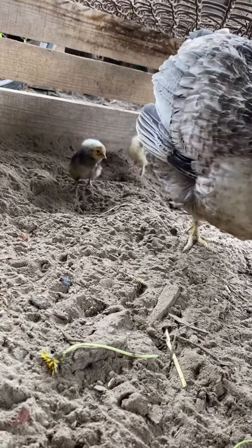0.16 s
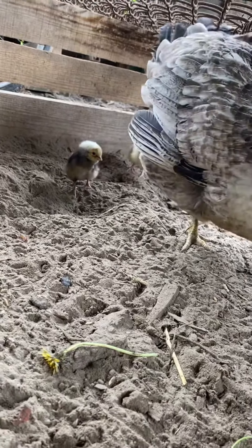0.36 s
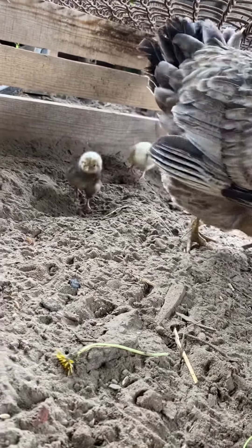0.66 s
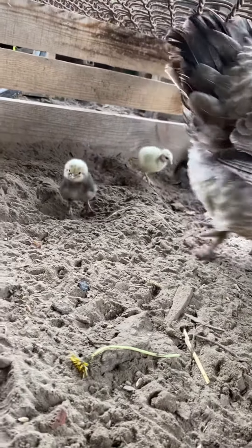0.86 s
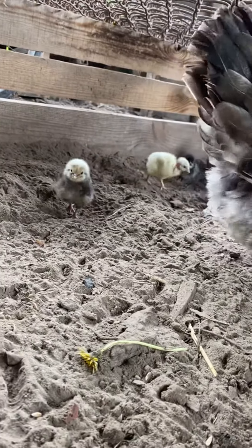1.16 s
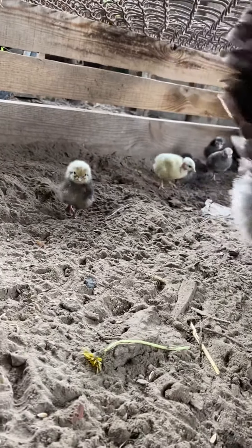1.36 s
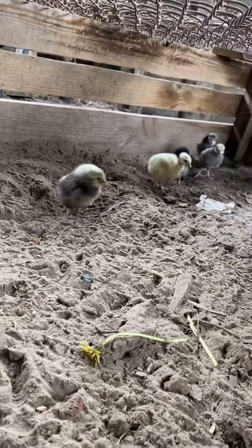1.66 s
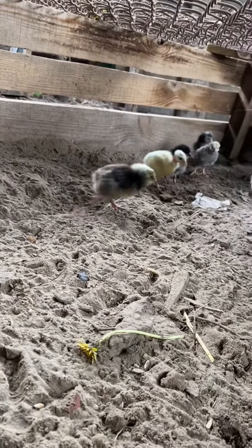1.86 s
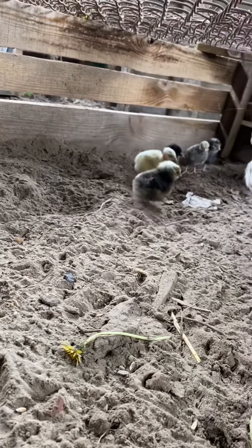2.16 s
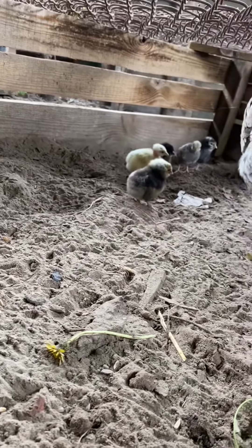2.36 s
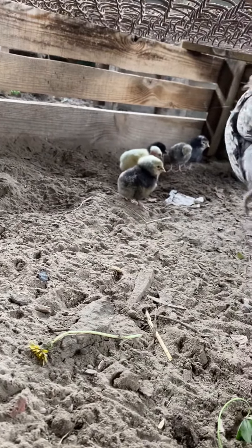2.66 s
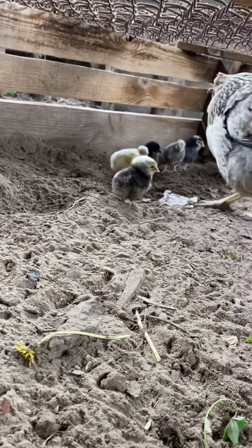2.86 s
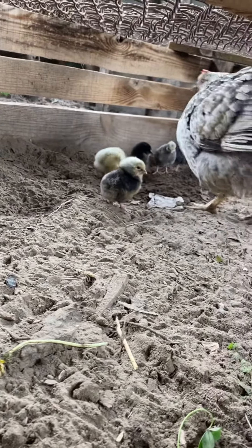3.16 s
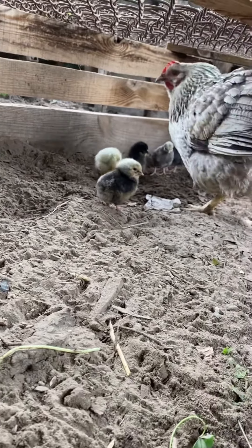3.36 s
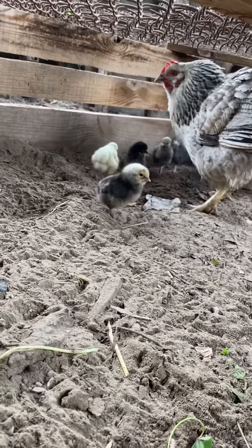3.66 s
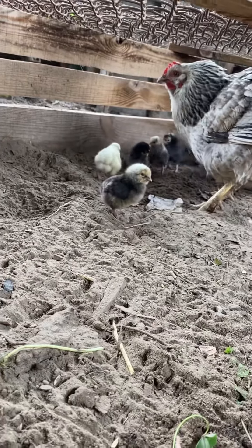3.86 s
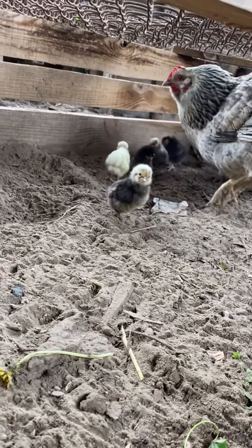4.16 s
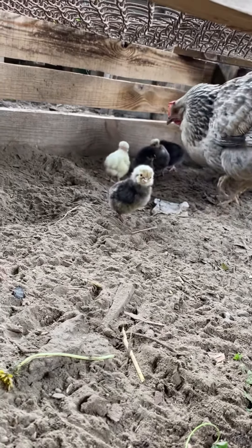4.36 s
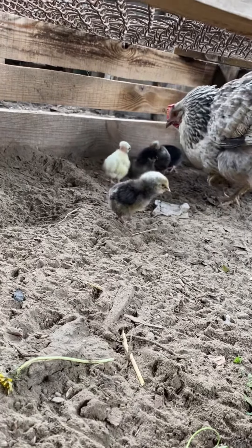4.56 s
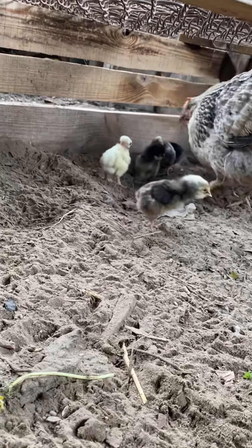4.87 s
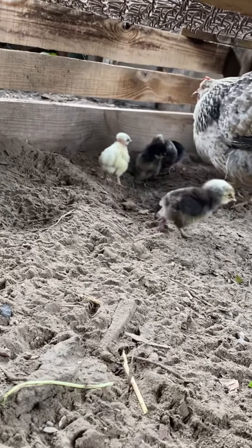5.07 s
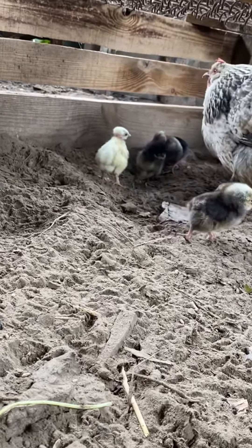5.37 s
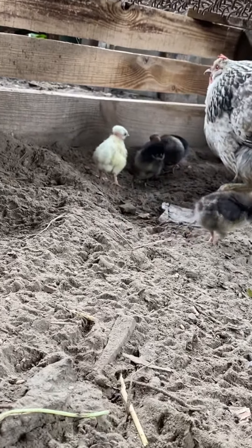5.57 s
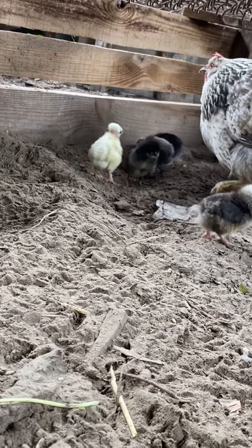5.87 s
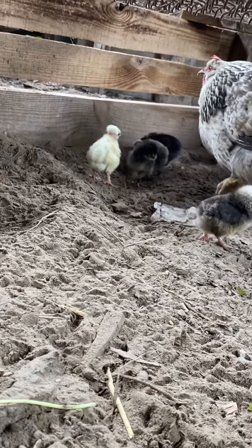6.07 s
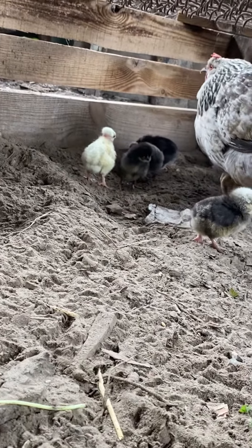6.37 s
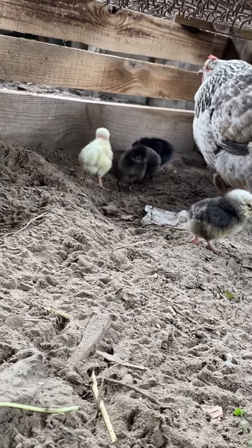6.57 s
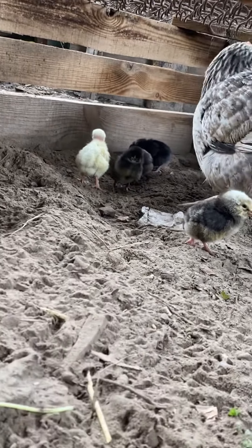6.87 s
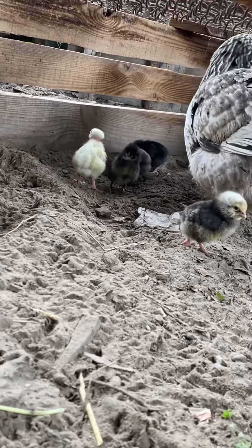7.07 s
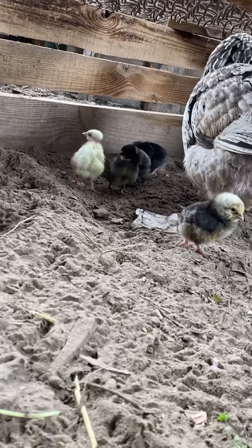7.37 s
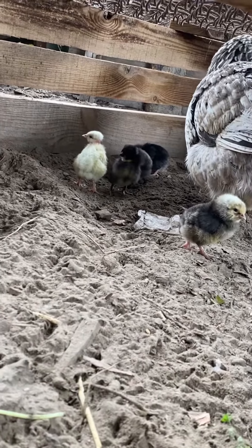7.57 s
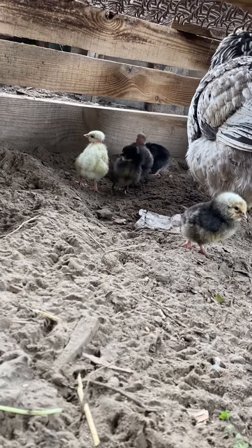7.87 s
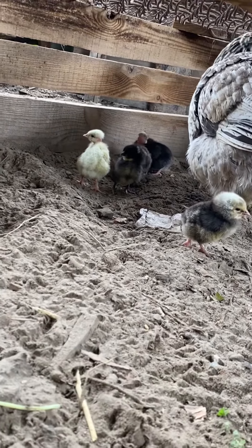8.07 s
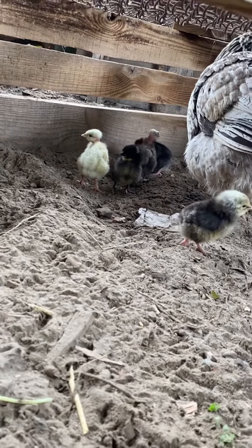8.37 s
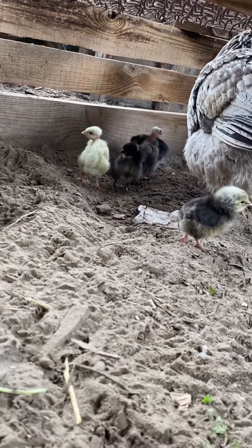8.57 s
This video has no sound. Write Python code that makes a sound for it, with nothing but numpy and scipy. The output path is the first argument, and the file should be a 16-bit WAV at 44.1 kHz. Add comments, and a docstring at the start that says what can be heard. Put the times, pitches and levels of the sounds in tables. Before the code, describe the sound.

Soft chick twitters and light taps lead to five sharp cries, a brief silent gap, then denser peeps, shuffling feet and distant clucks.

```python
"""A brood of chicks on the sandy floor of a plank-walled pen in a farmyard.
First come soft twitters and pips over taps and scratches in the sand, then one chick on the left cries loudly.
The sound fades to silence and returns with arched peeps and pips off to the right, as feet shuffle.
Further off a rooster crows and a hen clucks her way up to a squawk.
The chicks are whistles with a second voice, the fowl harmonics through a throat, feet and air shaped noise."""
import sys
import numpy as np
from scipy import signal
from scipy.fft import rfft, irfft, next_fast_len
from scipy.io import wavfile
from scipy.ndimage import map_coordinates

SR = 44100
rng = np.random.default_rng(int(sys.argv[2]) if len(sys.argv) > 2 else 0)


def put_to_file(sound):
    """Save the sound as 16-bit audio at rate SR, in the file named by the first command-line argument."""
    columns = np.atleast_2d(sound).T  # one column per channel
    safe = np.clip(columns, -1, 1)
    whole_steps = np.round(safe * 32767)
    wavfile.write(sys.argv[1], SR, whole_steps.astype(np.int16))


N = 384993
TIME = np.arange(N) / SR
PAUSE_START_S, PAUSE_END_S = 3.72, 4.335
CUTOFF_HZ = 15850

# In the call tables level_db is the base to which the effort over the call is added;
# second_db sets the second voice, overtone_db the overtones before the beak shapes them.

# Twitters, a held note that flicks up and drops: start_s, top_s (after the start), drop_s, held_hz,
# start_offset_hz (from the held note), top_hz, level_db, second_db, overtone_db
TWITTERS = [(0.026, .046, 0.019, 3650, -13, 4230, -25, -7, -22.5),
            (0.104, .019, 0.0077, 2540, 0, 3100, -31, -30, -15.5),
            (0.167, .032, 0.0097, 2760, 2, 3560, -37, -12, -21),
            (0.375, 0.045, 0.0049, 2630, 295, 3360, -17.5, -24, -30),
            (0.495, .042, .005, 3020, 183, 3750, -33.5, -30, -42),
            (0.525, .056, 0.0078, 3250, 52, 3960, -28, -33, -44),
            (0.663, 0.04, 0.004, 3610, 0, 4370, -34.5, -13, -30),
            (0.74, 0.05, 0.016, 3690, -130, 4200, -24, -13, -31),
            (0.943, 0.048, 0.02, 3640, 0, 4190, -20, -9.5, -23.5),
            (1.040, 0.011, .007, 2940, 0, 3500, -38, -25, -27),
            (1.054, 0.02, 0.0075, 2310, 150, 3400, -29.5, -25, -15),
            (1.212, 0.04, 0.0013, 3186, -6, 4470, -32.5, -21, -33),
            (1.277, 0.013, .003, 3060, 0, 3740, -44, -25, -25),
            (1.716, 0.031, .003, 2930, -2, 3100, -41.5, -10, -25),
            (1.755, 0.046, 0.0087, 2816, 141, 3390, -28, -28, -24),
            (2.435, .03, .006, 2880, 1, 3260, -40.5, -24.5, -23)]
FLICK_S, DROP_HZ_PER_S = 0.018, 79000
# below the held note: at the start, the top and the end
TWITTER_SWELL_DB, FLICK_LOSS_DB, DROP_LOSS_DB = 6, 5.5, 8.5

# Cries, loud calls that swell as they sag and then plunge: start_s, length_s, level_db
CRIES = [(2.174, 0.11, -17), (2.456, 0.13, -15.5), (2.75, 0.14, -19), (3.064, 0.14, -21),
         (3.37, .14, -27.5)]
# Sag, shoulder, plunge and a short foot of a cry: share_of_call, pitch_hz
CRY_PITCH = [(0, 4720), (.28, 4266), (.72, 3760), (.91, 2530), (1, 2289)]
# Effort through a cry: share_of_call, effort_db
CRY_EFFORT = [(0, -23.5), (.28, -12.5), (.62, -5), (.74, 1.5), (.9, -10), (1, -18)]

# Peeps, long arches: start_s, length_s, crest_hz, bow (of the fall: 1 = straight, more = held longer),
# level_db, second_db, overtone_db
PEEPS = [(4.385, .14, 4400, 2, -52, -15, -17), (4.639, 0.12, 3830, 1.67, -31, -4, -20.5),
         (4.874, 0.13, 4170, 1.43, -29.5, -4.5, -17.5), (5.431, 0.15, 3460, 1.73, -42, -12, -34),
         (5.467, 0.13, 4240, 1.5, -31, -11.5, -17), (5.673, 0.14, 3670, 1.7, -40, -26, -21),
         (5.750, 0.12, 4180, 1.92, -28.5, -6, -15.5), (6.525, 0.12, 3970, 1.45, -29.5, -10, -16),
         (6.744, 0.11, 3940, 1.8, -25, -20, -17.5), (7.152, 0.16, 4070, 1.97, -23.5, -10, -22.5),
         (7.385, .2, 3300, 1.9, -39, -25, -21), (7.422, 0.11, 3913, 1.95, -25, -8, -19.5),
         (7.731, 0.11, 4054, 2.2, -28, -6.5, -17.5), (7.833, 0.11, 3980, 1.24, -31.5, -15, -15),
         (7.895, 0.094, 3375, 2.1, -32.5, -11, -33), (8.094, .116, 4120, 1.65, -29, -27, -17),
         (8.177, 0.087, 3690, 1.8, -32.5, -7, -19.5), (8.275, 0.11, 4034, 1.7, -39.5, -6, -19),
         (8.351, 0.085, 3546, 1.8, -34.5, -22, -32), (8.416, .125, 4330, 1.2, -37, -24, -23),
         (8.497, 0.086, 3880, 1.8, -40, -11, -11), (8.585, 0.14, 4320, 1.75, -35, -11, -11.5)]
# Effort through a peep: share_of_call, effort_db
PEEP_EFFORT = [(0, -10), (.17, -7), (.62, -1.5), (1, -3)]
PEEP_RISE_S, PEEP_MEAN_RISE_HZ_PER_S, PEEP_END_HZ, PEEP_PAN_DB = 0.02, 37000, 2310, -9

# Pips, short slurs, soft to loud: start_s, length_s, rise_s, top_hz, end_hz, bow (of the fall), level_db,
# overtone_db, pan_db (left over right)
PIPS = [(0.684, 0.039, 0.0086, 3350, 2620, 0.48, -32, -14, -1),
        (0.917, 0.036, 0.0091, 3480, 2680, 0.85, -31, -10.5, -1),
        (1.846, 0.031, 0.00053, 3900, 2656, 0.56, -20, -19, -2.5),
        (1.962, 0.081, 0, 3647, 3270, 1.14, -16.5, -14.5, 4),
        (2.004, 0.025, 0.00066, 3475, 2740, 1.46, -16.5, -21, -3),
        (2.039, .018, 0.0013, 2800, 2740, 0.83, -30.5, -20.5, 2.5),
        (2.104, 0.067, 0.0025, 4360, 2980, 0.95, -28, -13, 11.5),
        (2.179, 0.054, 0.007, 3420, 2910, 1.7, -26.5, -29, -4),
        (2.364, 0.058, 0.002, 3650, 2920, 1.8, -28.5, -36, -3.5),
        (2.868, 0.044, 0.0023, 3840, 2950, 1.5, -30, -22, 5),
        (3.008, 0.042, 0.0026, 5370, 4480, 0.89, -47, -16, 9),
        (3.038, 0.047, 0, 3910, 2690, 1.4, -26, -15.5, 11.5),
        (4.346, 0.053, 0.0045, 2624, 2440, 3.5, -31.5, -26.5, -8),
        (4.475, 0.068, .024, 2800, 2480, 1.9, -38.5, -18, -8.5),
        (4.739, 0.044, 0, 2750, 2450, 1.07, -38.5, -12, -8),
        (5.596, 0.04, .01, 2660, 2430, 1.5, -29.5, -34, -7),
        (5.755, 0.068, .025, 2810, 2520, 1.73, -34.5, -17, -7.5),
        (6.065, 0.073, 0.028, 3630, 2940, 0.63, -34.5, -17, -12),
        (6.21, 0.085, 0.029, 3780, 2900, 0.64, -34.5, -14, -11.5),
        (6.411, 0.036, 0.0094, 3300, 2550, 1.3, -29, -20, -12.5),
        (6.506, 0.039, 0, 3040, 2430, 0.84, -31.5, -30, -16),
        (6.532, 0.04, 0.02, 3420, 2670, 0.63, -26.5, -36, -12),
        (6.677, 0.053, 0.012, 3470, 2400, 1.08, -28.5, -26, -12),
        (6.763, 0.057, .022, 2627, 2390, 2, -29, -22, -11),
        (6.909, 0.053, .018, 2775, 2500, 2, -32.5, -19.5, -8.5),
        (7.035, 0.064, 0.011, 3515, 2950, 1.5, -36.5, -22, -13),
        (7.165, .049, 0.0071, 2920, 2590, 1.3, -30.5, -21, -17),
        (7.332, 0.043, 0.0034, 3020, 2660, 1.25, -32.5, -29, -9),
        (7.645, 0.096, 0.025, 3440, 2580, 0.72, -33, -20, -11),
        (7.661, 0.1, 0.019, 3860, 3090, 0.74, -34.5, -14, -8),
        (7.753, 0.052, 0.017, 3160, 2340, 0.46, -26.5, -40, -13),
        (8.101, 0.057, 0.0035, 3480, 2080, 1.1, -33, -38, -14),
        (8.271, 0.032, 0.01, 3630, 2190, 0.87, -34.5, -10, -11),
        (8.300, 0.054, 0, 3020, 2425, 1.03, -28, -27, -12.5),
        (8.581, 0.05, 0.0081, 3210, 2520, 0.66, -34.5, -20, -13)]
# Effort through a pip: share_of_call, effort_db
PIP_EFFORT = [(0, -9), (.28, -4.5), (.6, -1), (1, -7.5)]
PIP_MEAN_RISE_HZ_PER_S = 16200

# How a chick's throat and beak pass the overtones: frequency_hz, gain_db
BEAK = [(4500, 0), (5400, 3), (6500, -3), (7800, -1.5), (8700, -6), (10000, -33.5), (12000, -22.5),
        (15000, -39.5)]

# The hen's clucks, about four a second: start_s, level_db
CLUCKS = [(4.81, -50), (5.031, -48.5), (5.271, -50.5), (5.498, -50), (5.731, -49), (5.959, -47.5),
          (6.217, -50.5), (6.468, -42.5), (6.736, -49.5), (7.022, -45.5), (7.289, -59), (7.529, -46),
          (7.802, -48.5)]
CLUCK_S, CLUCK_TOP_HZ = 0.0796, 368.8
# The hen's squawk: time_s, pitch_hz, level_db
SQUAWK = [(7.89, 511, -39), (7.92, 511.7, -44), (7.97, 526, -45.5), (8.0, 605, -39.5), (8.11, 608, -45),
          (8.19, 639, -44.5), (8.26, 595, -51.5)]
# The rooster's crow: time_s, pitch_hz, level_db
CROW = [(4.56, 577, -66.5), (4.82, 596, -55.5), (5.0, 594.5, -52.5), (5.12, 592.6, -53), (5.2, 578, -62)]
# Throat of a grown fowl: frequency_hz, gain_db
THROAT = [(250, -20), (600, -7.5), (830, 0), (1120, 2.5), (1480, -4), (1850, -7.5), (2400, -16),
          (4000, -31)]

# Pecks and footfalls: start_s, peak_db, centre_hz
TAPS = [(0.403, -39, 1530), (.557, -42, 1700), (0.631, -42, 4930), (0.792, -27, 1710), (1.096, -34, 2200),
        (1.335, -47, 3200), (1.427, -43, 4100), (1.601, -31, 3760), (2.041, -41.5, 870), (3.319, -44, 2230),
        (3.347, -46.5, 1800), (3.561, -45, 1533), (6.607, -37, 8200), (7.428, -37, 7320),
        (8.344, -35.5, 487.5), (8.686, -30, 7040)]
# Feet sweeping the sand: start_s, length_s, level_db
SCRATCHES = [(0.615, 0.05, -49.5), (0.748, 0.094, -46), (1.061, 0.037, -49), (4.36, 0.039, -64),
             (5.103, 0.099, -48), (6.369, 0.041, -43), (6.91, .06, -51), (8.275, 0.12, -58)]
# Shuffling in the sand: time_s, level_db (midway between the ears)
SHUFFLE = [(4.35, -64.5), (5.35, -72.5), (5.6, -52), (6.0, -61.5), (6.55, -45), (6.98, -58.5), (7.2, -49.5),
           (7.58, -52), (7.8, -49), (8.73, -46.5)]
# Colour of moving sand: frequency_hz, density_db (per Hz)
SAND = [(800, -9.5), (2500, 3.5), (5000, -2), (9000, -2.5), (12000, -4.5), (16000, -20)]

# Murmur of the yard's air before the pause: time_s, level_db
EARLY_AIR = [(0, -51.5), (2.4, -52), (3.1, -57.5), (3.48, -65.5), (3.7, -68.5)]
# Murmur after the pause: time_s, level_db
LATE_AIR = [(4.34, -55), (5.6, -52.5), (8.73, -50.5)]
# Colour of the murmur before the pause: frequency_hz, density_db (per Hz)
EARLY_COLOUR = [(30, -13.5), (110, -5.5), (200, -1), (850, 1), (1400, -3.5), (5000, -8), (12000, -15),
                (15800, -15.5)]
# Colour of the murmur after the pause: frequency_hz, density_db (per Hz)
LATE_COLOUR = [(100, -3.5), (160, -0.5), (300, -5), (600, -1.5), (1100, -0.5), (2000, -5.5), (4000, -12),
               (8000, -37.5), (15000, -26)]
# Colour of the low rumble: frequency_hz, density_db (per Hz)
RUMBLE = [(20, -1), (40, -9.5), (60, -3.5), (87, -0.5), (120, -6.5), (200, -22), (400, -41.5)]
# How alike the noise is in the two ears: frequency_hz, correlation (1 = identical)
LIKENESS = [(30, 0.44), (80, 0.62), (500, 0.75), (2000, 0.49), (8000, 0.3), (14000, 0.18)]


def twitters():
    """Contented chicks close by, in the open; the voice weakens as it flicks up."""
    out = np.zeros((2, N))
    for start_s, top_s, drop_s, held_hz, start_offset_hz, top_hz, db, second_db, overtone_db in TWITTERS:
        flick_start_s = max(top_s - FLICK_S, top_s / 3)
        turns = np.array([0, flick_start_s, top_s, top_s + max(drop_s, 1 / SR)])
        t = clock(turns[-1])
        end_hz = top_hz - DROP_HZ_PER_S * drop_s
        hz = glide(t, turns, np.array([held_hz + start_offset_hz, held_hz, top_hz, end_hz]))
        effort = db - np.interp(t, turns, [TWITTER_SWELL_DB, 0, FLICK_LOSS_DB, DROP_LOSS_DB])
        call = chick_call(t, hz, effort, beat_hz=472, second_db=second_db, second_hold_s=0.032,
                          second_fade_s=0.24, overtone_db=overtone_db, waver=0.0028,
                          flutter_db=3.0, attack_s=0.006, pan_db=-2.0)
        add(out, start_s, call)
    return out + from_db(-15.0) * echoes(out, t60=0.12, first_s=0.0029, per_s=2600)


def cries():
    """One chick on the left calls out three times a second, hoarse at each start."""
    out = np.zeros((2, N))
    for start_s, length_s, db in CRIES:
        t = clock(length_s)
        share = t / t[-1]
        hz = glide(share, *np.transpose(CRY_PITCH))
        effort = db + np.interp(share, *np.transpose(CRY_EFFORT))
        call = chick_call(t, hz, effort, beat_hz=341.4, second_db=-1, second_hold_s=0.019,
                          second_fade_s=0.03, overtone_db=-10, waver=0.00765,
                          flutter_db=4.0, attack_s=0.0048, pan_db=3.5)
        add(out, start_s, call)
    return in_pen(out, planks_db=-3.5, pen_db=-10, yard_db=-36.5)


def peeps():
    """Calls from beside the planks, some fainter, in the background; the pen and yard throw them back."""
    faint = long_peeps(background_brood(7.62, 8.62, level_db=-41, second_db=-15, count=17))
    near_peeps = in_pen(long_peeps(PEEPS), planks_db=-5.5, pen_db=-18.5, yard_db=-28.0)
    return near_peeps + in_pen(faint, planks_db=-1.5, pen_db=-8, yard_db=-25.0)


def long_peeps(rows):
    """Arched whistles that all leap up alike and end on the same low note."""
    out = np.zeros((2, N))
    for start_s, length_s, crest_hz, bow, db, second_db, overtone_db in rows:
        t = clock(length_s)
        hz = arch(t, PEEP_RISE_S, PEEP_MEAN_RISE_HZ_PER_S, crest_hz, PEEP_END_HZ, bow)
        effort = db + np.interp(t / t[-1], *np.transpose(PEEP_EFFORT))
        call = chick_call(t, hz, effort, beat_hz=330.0, second_db=second_db, second_hold_s=0.036,
                          second_fade_s=0.03, overtone_db=overtone_db, waver=0.0071,
                          flutter_db=3.5, attack_s=0.0038, pan_db=PEEP_PAN_DB)
        add(out, start_s, call)
    return out


def background_brood(start_s, end_s, level_db, second_db, count):
    """Faint background chicks join in with peeps of the same kinds, at random moments."""
    rows = []
    for kind, when, size in rng.random((count, 3)):
        _, length_s, crest_hz, bow, _, _, overtone_db = PEEPS[int(kind * len(PEEPS))]
        call_s = start_s + (end_s - start_s) * when
        length_s = length_s * (0.55 + 0.5 * size)
        crest_hz = crest_hz * (0.85 + 0.2 * size)
        rows.append((call_s, length_s, crest_hz, bow, level_db, second_db, overtone_db))
    return rows


def pips():
    """Short contact calls from all over the brood."""
    out = np.zeros((2, N))
    for start_s, length_s, rise_s, top_hz, end_hz, bow, db, overtone_db, pan_db in PIPS:
        t = clock(length_s)
        hz = arch(t, rise_s, PIP_MEAN_RISE_HZ_PER_S, top_hz, end_hz, bow)
        effort = db + np.interp(t / t[-1], *np.transpose(PIP_EFFORT))
        call = chick_call(t, hz, effort, beat_hz=334, second_db=-18.5, second_hold_s=0.012,
                          second_fade_s=0.04, overtone_db=overtone_db, waver=0.0033,
                          flutter_db=1.9, attack_s=0.006, pan_db=pan_db)
        add(out, start_s, call)
    return in_pen(out, planks_db=-9.5, pen_db=-15.5, yard_db=-28.0)


def chick_call(t, hz, effort, beat_hz, second_db, second_hold_s, second_fade_s, overtone_db,
               waver, flutter_db, attack_s, pan_db):
    """A near-pure whistle; the syrinx's other side adds a second voice just above, mostly early on."""
    hz = hz * (1 + waver * drift(350, len(t)))
    phase = 2 * np.pi * np.cumsum(hz) / SR
    beat = 2 * np.pi * np.cumsum(beat_hz * (1 + 0.05 * drift(120, len(t)))) / SR
    depth = from_db(second_db - 20 * np.maximum(t - second_hold_s, 0) / second_fade_s)
    # the two voices pull on each other, which gives further side tones
    coupling = 1 + depth * np.exp(1j * beat)
    coupling = coupling + 0.14 * depth * np.exp(-1j * beat) + 0.462 * depth ** 2 * np.exp(2j * beat)
    # while both voices sound the cycles are unsteady and the call rasps
    phase = phase + 0.19 * np.minimum(depth, 1) * drift(3000, len(t))
    overtones = overtone_db + 0.12 * (effort - effort.max())   # brightest where it is loudest
    tone = np.exp(1j * phase)
    for k, source_db in enumerate([0, -7, -16], 2):
        both_voices = np.exp(1j * k * phase) + 0.8 * depth * np.exp(1j * k * (phase + beat))
        tone = tone + from_db(overtones + source_db + at_hz(BEAK, k * hz)) * both_voices
    level = from_db(effort + flutter_db * drift(150.2, len(t))) * gate(t, attack_s, 0.003)
    return place(np.sqrt(2) * level * (tone * coupling).real, pan_db)


def arch(t, rise_s, mean_rise_hz_per_s, top_hz, end_hz, bow):
    """Pitch climbs to a rounded crest, then falls ever faster (bow over 1) or ever slower (under 1)."""
    climb = mean_rise_hz_per_s * np.maximum(rise_s - t, 0) ** 2 / max(rise_s, 1 / SR)
    fall = np.clip((t - rise_s) / (t[-1] - rise_s), 0, 1) ** abs(bow)
    return top_hz - climb - (top_hz - end_hz) * fall


def glide(t, times, values):
    """A rounded path through turning points, level at each crest and trough."""
    steps = np.diff(times)
    slopes = np.diff(values) / steps
    product = slopes[:-1] * slopes[1:]
    inner = 2 * np.maximum(product, 0) / (slopes[:-1] + slopes[1:] + 1e-9)   # harmonic mean slope
    tangent = np.r_[slopes[0], inner, slopes[-1]]
    tangent[[0, -1]] += (tangent[[0, -1]] - tangent[[1, -2]]) / 2
    k = np.clip(np.searchsorted(times, t) - 1, 0, len(steps) - 1)
    u = (t - times[k]) / steps[k]
    bow = (1 - u) * (tangent[k] - slopes[k]) - u * (tangent[k + 1] - slopes[k])
    return values[k] + steps[k] * u * (slopes[k] + (1 - u) * bow)


def clock(length_s):
    """Times from the start of a call to its end, at least 10 ms."""
    return np.arange(0, max(length_s, 0.01), 1 / SR)


def grown_fowl():
    """Clucks, a squawk and a crow, blurred by the yard."""
    out = np.zeros(N)
    for start_s, db in CLUCKS:
        cluck = [(start_s, CLUCK_TOP_HZ * 0.9, db),
                 (start_s + CLUCK_S / 2, CLUCK_TOP_HZ, db),
                 (start_s + CLUCK_S, CLUCK_TOP_HZ * 0.93, db - 11.0)]
        add(out, *fowl_call(cluck, rough=0.81, jitter=0.041))
    add(out, *fowl_call(SQUAWK, rough=0.57, jitter=0.017))
    add(out, *fowl_call(CROW, rough=0.06, jitter=0.0023))
    direct = place(out, pan_db=1.5)[:, :N]
    return from_db(-1.0) * direct + echoes(direct, t60=0.41, first_s=0.005, per_s=1500)


def fowl_call(rows, rough, jitter):
    """A reedy voice through the throat; roughness groups cycles in threes, filling between harmonics."""
    times, pitches, levels = np.transpose(rows)
    t = np.arange(times[0], times[-1], 1 / SR)
    hz = np.interp(t, times, pitches) * (1 + jitter * drift(194.4, len(t)))
    phase = 2 * np.pi * np.cumsum(hz) / SR
    voice = np.zeros(len(t))
    for k in np.arange(2, 22) / 3:   # thirds of the pitch; whole numbers are the harmonics
        strength = 1 if k % 1 == 0 else rough * drift(60.0, len(t))
        partial = np.sin(k * phase + rng.uniform(0, 2 * np.pi))
        voice += from_db(at_hz(THROAT, k * hz)) * strength * partial
    level = from_db(np.interp(t, times, levels)) * gate(t, 0.0029, 0.016)
    return t[0], rms_one(voice) * level


def feet():
    """Dull taps on the ground, sweeps that set sand grains hissing, and stray bits of grit."""
    taps, sweeps = np.zeros((2, N)), np.zeros(N)
    t = np.arange(SR // 10) / SR
    for start_s, peak_db, hz in TAPS:
        noise = rng.standard_normal(len(t)) + 0.5 * rng.standard_normal((2, len(t)))
        crunch = noise * from_db(-60 * t / 0.054)
        tap = band(crunch * np.minimum(t / 0.0032, 1), hz / 2, hz * 2)
        add(taps, start_s, from_db(peak_db) * tap / np.abs(tap).max())
    for start_s, length_s, db in SCRATCHES:
        add(sweeps, start_s, from_db(db) * np.hanning(int(length_s * SR)) ** 0.5)
    shuffle = gain_curve(SHUFFLE) * (TIME > PAUSE_END_S)
    shuffle = shuffle * from_db([[-2], [2]])   # leans to the right
    grains = rms_one(from_db(1.96 * drift(900, N) + 2 * drift(45, N)))
    specks = rms_one(from_db(20 * np.minimum(drift(250, N), 2)))
    grit = from_db(-8) * gain_curve(EARLY_AIR) * specks
    return taps + ((sweeps + shuffle) * grains + grit) * air_noise(SAND)


def yard_air():
    """Outdoor murmur of coloured noise, joined after the pause by a low rumble."""
    early = gain_curve(EARLY_AIR) * air_noise(EARLY_COLOUR)
    late = gain_curve(LATE_AIR) * air_noise(LATE_COLOUR) + from_db(-57.5) * air_noise(RUMBLE)
    return np.where(TIME < PAUSE_START_S, early, late)


def air_noise(spectrum):
    """Stereo noise of a given colour, most alike in the two ears around 500 Hz."""
    size = next_fast_len(N)
    hz = np.maximum(np.fft.rfftfreq(size, 1 / SR), 1)
    mid, side = rfft(rng.standard_normal((2, size)))
    alike = np.clip(at_hz(LIKENESS, hz), -1, 1)
    both = np.sqrt(1 + alike) * mid + np.sqrt(1 - alike) * side * [[1], [-1]]
    return rms_one(irfft(both * from_db(at_hz(spectrum, hz)))[:, :N])


def in_pen(x, planks_db, pen_db, yard_db):
    """A sound with its reflections from the nearest planks, the pen and the yard."""
    planks = from_db(planks_db) * echoes(x, t60=0.055, first_s=0.003, per_s=900)
    pen = from_db(pen_db) * echoes(x, t60=0.17, first_s=0.014, per_s=2300)
    yard = from_db(yard_db) * echoes(x, t60=0.3, first_s=0.019, per_s=3100)
    return x + planks + pen + yard


def echoes(x, t60, first_s, per_s):
    """Scattered reflections, different in each ear, dying away."""
    t = np.arange(SR) / SR
    arrivals = rng.standard_normal((2, SR)) * (rng.random((2, SR)) < per_s / SR)
    response = arrivals * (t > first_s) * from_db(-60 * t / t60)
    response /= np.sqrt(np.sum(response ** 2, axis=1, keepdims=True) + 1e-20)
    return signal.fftconvolve(x, response, axes=1)[:, :N]


def place(sound, pan_db):
    """The ear turned away hears a sound weaker and, well off centre, a few samples later."""
    gains = from_db(np.array([pan_db, -pan_db]) / 2)   # left, right
    lag = int(abs(pan_db) / 4)   # samples
    near, far = np.pad(sound, (0, lag)), np.pad(sound, (lag, 0))
    ears = [far, near] if pan_db < 0 else [near, far]
    return rms_one(gains)[:, None] * np.array(ears)


def from_db(db):
    """Decibels to gain."""
    return 10 ** (np.asarray(db) / 20)


def rms_one(x):
    """Scale to unit power."""
    return x / np.sqrt(np.mean(x ** 2) + 1e-20)


def at_hz(points, hz):
    """Read a spectrum on a log-frequency axis."""
    points_hz, points_db = np.transpose(points)
    return np.interp(np.log(hz), np.log(points_hz), points_db)


def gain_curve(rows):
    """Gain over the whole scene from rows of time_s, level_db."""
    return from_db(np.interp(TIME, *np.transpose(rows)))


def drift(rate_hz, size):
    """Smooth random wander with a spread near 1."""
    knots = rng.standard_normal(int(size * rate_hz / SR) + 4)
    return map_coordinates(knots, [1 + np.arange(size) * rate_hz / SR], order=2)


def add(out, start_s, sound):
    """Mix a sound in at a given time."""
    i = max(int(start_s * SR), 0)
    out[..., i:i + sound.shape[-1]] += sound[..., :max(N - i, 0)]


def band(x, low_hz, high_hz):
    """Band-pass with gentle skirts."""
    edges = [low_hz, min(high_hz, 0.45 * SR)]
    return signal.sosfilt(signal.butter(2, edges, "band", fs=SR, output="sos"), x)


def gate(t, rise_s, fall_s):
    """Soft start and stop over the times t."""
    ramp = np.minimum((t - t[0]) / rise_s, (t[-1] - t) / fall_s)
    return np.sin(np.pi / 2 * np.clip(ramp, 0, 1)) ** 2


def scene():
    """Everything in and around the pen."""
    return twitters() + cries() + peeps() + pips() + grown_fowl() + feet() + yard_air()


def record(dry):
    """The sound fades into a silent pause and comes back at once; the top is cut steeply."""
    fade_out = (PAUSE_START_S - TIME) / 0.15
    fade_in = (TIME - PAUSE_END_S) / 0.015
    heard = np.clip(np.maximum(fade_out, fade_in), 0, 1)
    low_pass = signal.ellip(12, 0.1, 90, CUTOFF_HZ, fs=SR, output="sos")
    return signal.sosfilt(low_pass, dry * heard)


dry = scene()
out = record(dry)
put_to_file(out)
```